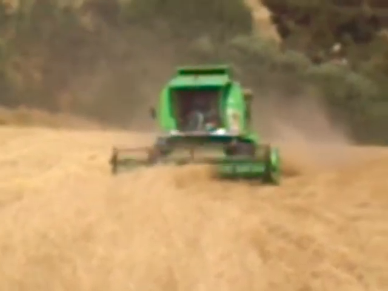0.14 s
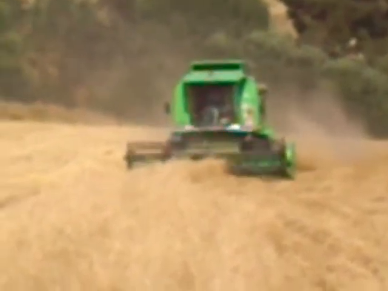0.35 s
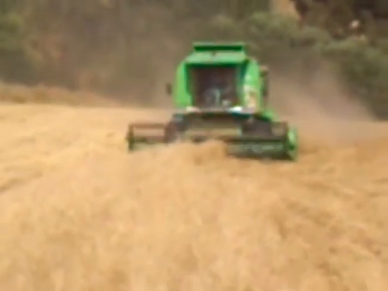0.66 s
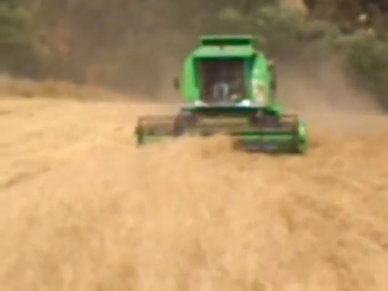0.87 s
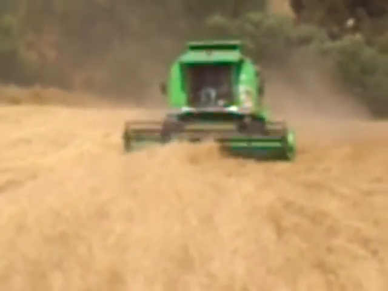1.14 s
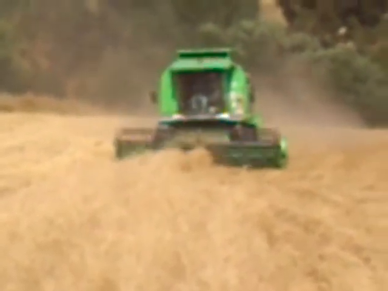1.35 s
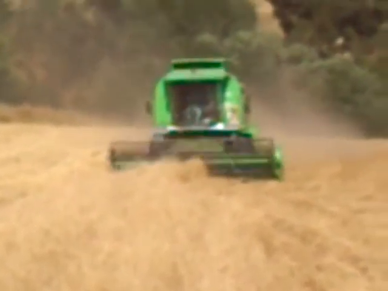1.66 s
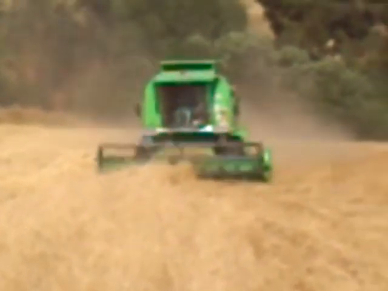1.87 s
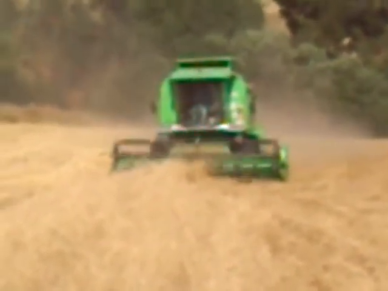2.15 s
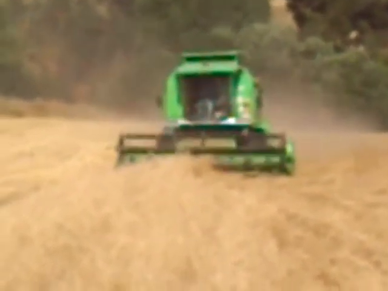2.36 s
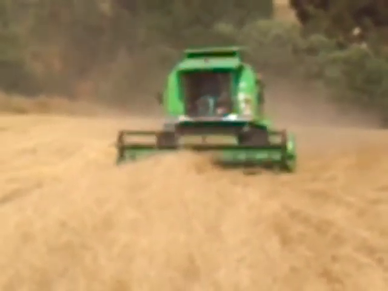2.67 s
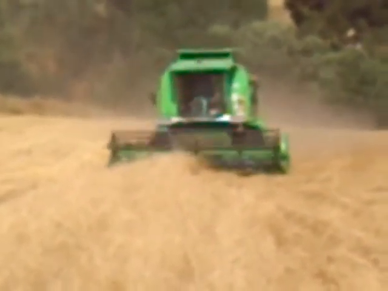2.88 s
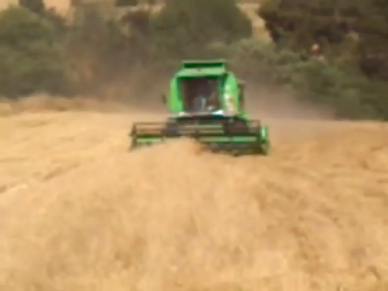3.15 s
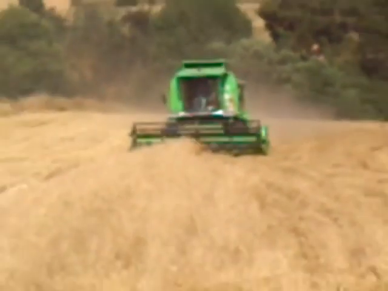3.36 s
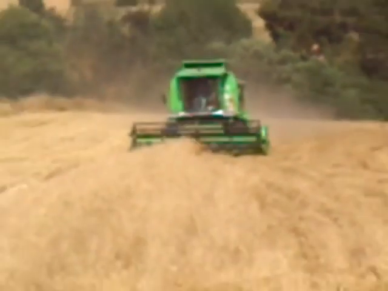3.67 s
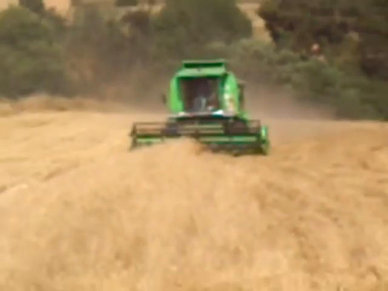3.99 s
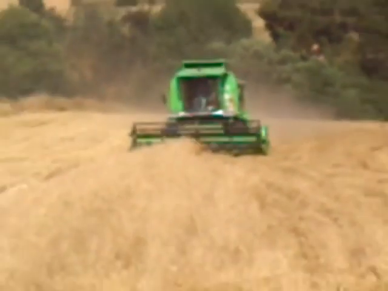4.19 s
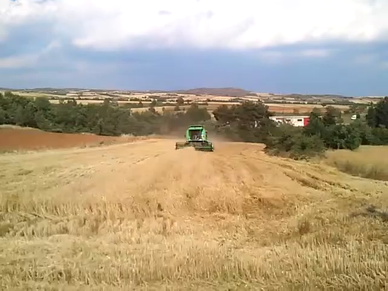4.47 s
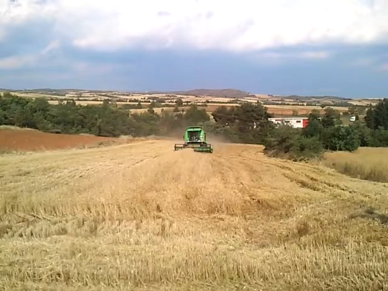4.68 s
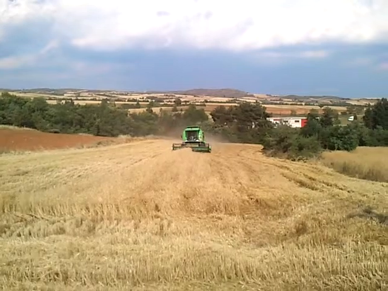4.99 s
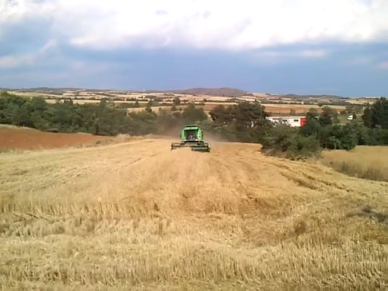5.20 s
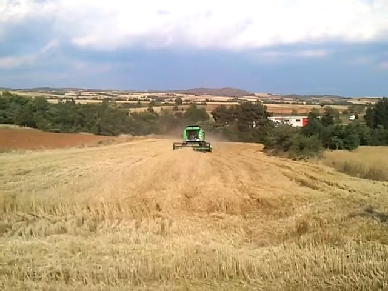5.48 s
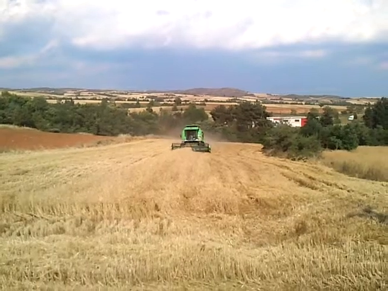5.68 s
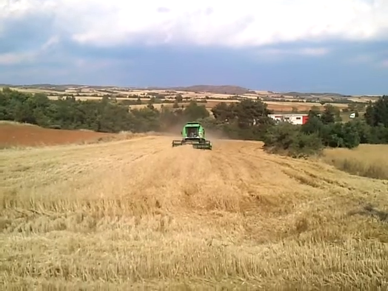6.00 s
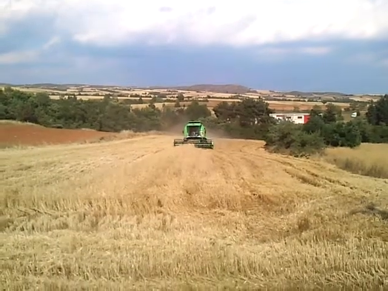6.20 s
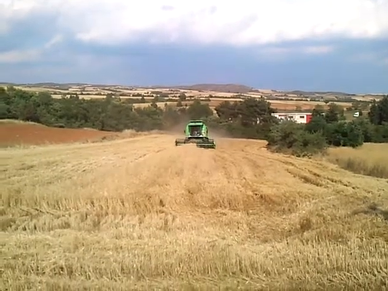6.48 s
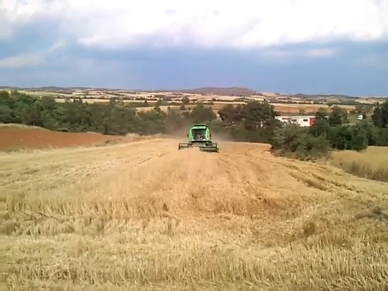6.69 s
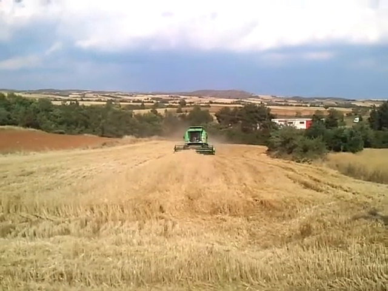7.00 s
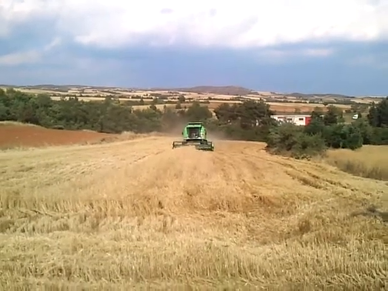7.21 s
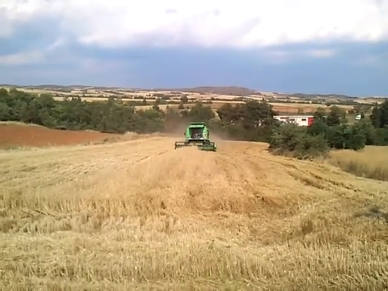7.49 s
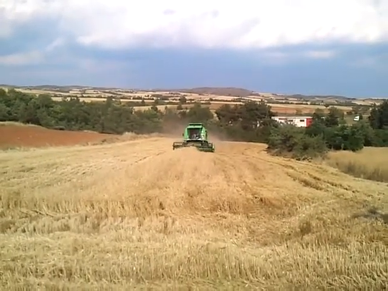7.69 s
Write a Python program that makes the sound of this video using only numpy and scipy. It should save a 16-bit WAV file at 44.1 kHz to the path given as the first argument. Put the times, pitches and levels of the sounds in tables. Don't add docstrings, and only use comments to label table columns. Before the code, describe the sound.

Outdoor handheld sound of a far harvester working under load: constant engine and fan hum, broad straw and metal roar. Wind rumbles and thumps unevenly across both channels, heavier on the left, building to a crackling burst after four seconds and then dropping. Dry straw hisses, a high cricket trills softly at left, a switch clicks twice, the second time louder, and a bird peeps faintly.

```python
import sys
import numpy as np
from scipy import signal
from scipy.fft import rfft, irfft
from scipy.io import wavfile
from scipy.ndimage import uniform_filter1d

SR = 44100
rng = np.random.default_rng(int(sys.argv[2]) if len(sys.argv) > 2 else 0)


def master_out(mix):
    frames = np.transpose(np.atleast_2d(mix))
    ceiling = np.clip(frames, -1, 1)
    pcm = np.round(ceiling * 32767).astype(np.int16)
    wavfile.write(sys.argv[1], SR, pcm)


def natural_amplitude(level_db):
    exponent = np.asarray(level_db, float) / 20
    return 10 ** exponent


N = 346185
T = np.arange(N) / SR

# (pitch [Hz], level [dB], unsteadiness [dB])
HUM_TONES = [(60.6, -40.5, 3), (121.5, -43, 1), (136.6, -29.5, -0.02), (196.8, -44.5, 3), (259.4, -45, 0),
             (274.1, -46.5, 3), (316, -56, -4), (379, -56, 3), (387, -63, 14), (415.5, -63, 6),
             (425.3, -58, -15), (450, -72.5, 2), (602.5, -61.5, 8), (1162, -73.5, 7)]
FIRING_HZ = 61.6
# (time [s], threshing [dB], stalk rustle [dB])
FIELD_LEVELS = [(0, -42, -55), (.3, -42.5, -58.5), (.75, -43.5, -53.5), (1.4, -45.5, -56),
                (2.1, -44.5, -56), (2.7, -44, -53.5), (3.05, -40, -49.5), (3.5, -38.5, -47),
                (4.1, -41, -48.5), (4.8, -41, -50.5), (5.4, -39.5, -44.5), (6, -43, -51), (6.7, -43, -49.5),
                (7.2, -41.5, -55.5), (7.85, -42, -53.5)]
# (frequency [Hz], level [dB per Hz])
ROAR_COLOUR = [(40, -4), (100, -4), (165, -9.5), (225, -9), (270, -13.5), (350, -17.5), (420, -12),
               (495, -26.5), (560, -23), (900, -24.5), (1100, -24.5), (1700, -29.5), (2300, -32),
               (3200, -70.5)]
# (centre [Hz], width [Hz], level [dB])
HOUSING_RINGS = [(622, 100, 3.5), (754, 77, 5), (859, 73, 6.5), (1237, 320, -0.5), (1502, 110, -0.5),
                 (2100, 80, -1.5)]
RING_DB, RING_DB_PER_DB = 1.5, 1.17
GROUND_DB, EARLY_BOUNCE_DB = -11, 1.5
GROUND_FROM_HZ, GROUND_TO_HZ, GROUND_SETTLE_S = 900, 772.5, 1.5
# (frequency [Hz], level [dB per Hz])
STALK_COLOUR = [(1350, 15.5), (2300, -6.5), (2430, -1.5), (2800, 4.5), (3280, -10), (4130, 3), (5070, -3),
                (6130, -3.5), (6440, -7.5), (6910, -17), (7600, -21), (9880, -41), (16700, -120)]
# (frequency [Hz], left minus right [dB])
PORT_DIFFERENCE = [(60, 6), (200, 0.5), (640, 0.5), (950, -0.5), (1500, -7), (1950, 2.5), (2800, 4.5),
                   (3500, 1.5), (4300, 7), (5300, 6.5), (6000, 27), (12000, 27)]
LEFT_LEAD = 4

# (time [s], level [dB])
BREEZE = [(0, -22), (.4, -33), (.75, -30.5), (1, -21), (1.6, -23.5), (2.1, -26.5), (2.75, -28.5),
          (2.92, -14.5), (3.8, -20), (4.4, -17.5), (4.65, -26), (5.08, -26.5), (5.25, -43), (5.85, -44),
          (6.4, -35.5), (7, -36), (7.85, -29)]
LEE_DB = -12.5
# (time [s], left level [dB], right level [dB])
PUFFS = [(0, -23.5, -34), (.2, -30.5, -27), (.5, -30, -31), (.8, -42, -29), (0.901, -20, -31),
         (1.1, -22, -27), (1.299, -22, -24.5), (1.501, -19.5, -18), (1.75, -30, -24), (1.9, -24, -40),
         (2.2, -24.5, -28), (2.4, -30, -40), (2.6, -33, -34), (2.999, -17.5, -29), (3.1, -30, -24),
         (3.3, -16.5, -21), (3.5, -17, -37), (3.7, -20.5, -36), (3.9, -16, -30), (4.2, -14, -23),
         (4.299, -16.5, -17), (4.501, -13.5, -20), (4.7, -17.5, -30), (5.001, -24.5, -43), (5.5, -32, -52),
         (6, -28, -50), (6.199, -28.5, -33), (6.8, -27.5, -38), (7.15, -21.5, -33), (7.4, -22.5, -42)]
PUFF_S = 0.046
# (frequency [Hz], level [dB per Hz])
EDDY_COLOUR = [(12, -0.5), (25, 8.5), (50, 0.5), (100, -2.5), (200, -12), (400, -24.5), (800, -48),
               (1600, -58.5), (3000, -120)]
# (time [s], level [dB], treble share [dB])
LEFT_BURSTS = [(0.899, -22, -22), (1.092, -27.5, -16), (1.319, -17, -13.5), (1.918, -21, -14.5),
               (2.884, -15.5, -13.5), (2.983, -16.5, -13.5), (3.033, -15, -5.5), (3.211, -18.5, -8.5),
               (3.368, -14.5, -20), (3.44, -17, -17), (3.518, -12.5, -13), (3.718, -24, -19),
               (3.823, -18, -12), (3.868, -16.5, -7), (3.927, -18.5, -3), (4.055, -15, -14.5),
               (4.118, -19, -0.5), (4.146, -16, -7.5), (4.186, -18.5, -2), (4.208, -22, -5),
               (4.257, -17, -5.5), (4.293, -14.5, -12.5), (4.346, -7.5, -12), (4.41, -20.5, -1.5),
               (4.466, -7.5, -12.5), (4.498, -18, -7), (4.539, -15, -8), (4.703, -17, -8),
               (5.003, -24.5, -5), (7.7, -28, -27)]
# (time [s], level [dB], treble share [dB])
RIGHT_BURSTS = [(1.077, -21, -12.5), (1.153, -23.5, -19), (1.219, -20, -10), (1.382, -25, -18),
                (1.518, -15.5, -16.5), (1.594, -16.5, -24), (3.065, -29, -2), (3.118, -32, -15),
                (3.264, -28, -12), (3.307, -36, -16), (3.846, -20, -15), (4.302, -24, -9), (4.34, -20, -16),
                (4.482, -18, -12), (4.571, -24, -19)]
DEEP_SHARE = .17

STRUM_HZ = 19.7
# (time [s], slip [cycles])
STRUM_SLIP = [(0, .15), (.4, .16), (.8, .02), (2, 0), (3, -.19), (4.4, -.15), (6, -.32), (7.2, -.16),
              (7.85, -.18)]
# (centre [Hz], width [Hz], level [dB])
WING_RINGS = [(9030, 1730, -9), (9857, 600, 2), (10870, 650, -1.5), (12700, 470, -11.5)]
# (start [s], end [s])
WING_REST = (0.956, 1.15)
# (frequency [Hz], level [dB per Hz])
CHORUS_COLOUR = [(4120, -49), (7000, -10.5), (9310, 4), (9570, 3.5), (10100, -18.5), (10400, -3.5),
                 (11300, -6), (12700, -11), (16500, -54), (22000, -120)]
CRICKET_DB, SHY_DB_PER_DB = -51, -0.04

# (time [s], level [dB], centre [Hz], width [Hz], time to fade by 60 dB [s])
CLICKS = [
    (5.593, -31, 3120, 1800, 0.004),
    (5.613, -30.5, 450, 500, 0.025),
    (5.606, -41, 6400, 3004, .006),
    (6.841, -31, 4900, 3940, 0.0079),
    (6.85, -23, 2900, 4000, 0.0044),
    (6.864, -26.5, 3000, 5000, 0.015),
    (6.868, -28.5, 490, 930, 0.033),
]
# (time [s], level [dB], start pitch [Hz], end pitch [Hz], length [s])
PEEPS = [
    (7.262, -56, 3700, 2850, .022),
    (7.318, -57, 3600, 2850, .021),
]

CEILING = 1.05
# (frequency [Hz], level [dB per Hz])
SILENCE_BELOW = [(1500, -110), (2400, -100), (4500, -99), (7500, -99), (10000, -101), (11800, -99),
                 (12400, -95), (13500, -94)]
RIGHT_SILENCE_DB = 4.5
# (time [s], length [s], threshold rise [dB])
DROPOUTS = [(.06, .02, 7.5), (.98, .02, 6), (1.154, .06, 10), (1.256, .02, 9.5), (1.32, .045, 7.5),
            (1.501, .05, 6), (1.57, .07, 5), (1.928, .07, 7.5), (2.879, .03, 7.5), (3.24, .07, 7),
            (3.36, .02, 5.5), (4.39, .045, 14), (4.51, .025, 7), (7.14, .01, 8.5), (7.45, .025, 7),
            (7.7, .02, 8.5)]
TREBLE_DROPOUT = .35


def unit(x):
    return x / np.sqrt(np.mean(x ** 2))


def curve(rows, column):
    rows = np.array(rows, float)
    return np.interp(T, rows[:, 0], rows[:, column])


def shape(x, points):
    hz, db = np.transpose(points)
    f = np.maximum(np.fft.rfftfreq(N, 1 / SR), 1)
    gain = natural_amplitude(np.interp(np.log(f), np.log(hz), db))
    return irfft(rfft(x) * gain, N)


def band(x, hz, width):
    return signal.lfilter(*signal.iirpeak(min(hz, .45 * SR), hz / width, SR), x)


def walk(rate):
    k = int(SR / rate)
    steps = np.repeat(rng.standard_normal(N // k + 1), k)
    return 1.27 * uniform_filter1d(uniform_filter1d(steps, k), k)[:N]


def living(points, lo_hz, hi_hz, shared_db, own_db, rate, grit=0.):
    grains = natural_amplitude(grit * np.minimum(rng.exponential(size=N), 6))
    spectrum = rfft(shape(rng.standard_normal(N) * grains, points))
    octave = np.log2(np.maximum(np.fft.rfftfreq(N, 1 / SR), 1))
    shared = walk(rate)
    out = 0
    for centre in np.arange(np.log2(lo_hz), np.log2(hi_hz) + .5, .5):
        part = irfft(spectrum * np.clip(1 - 2 * abs(octave - centre), 0, 1), N)
        out = out + part * natural_amplitude(shared_db * shared + own_db * walk(rate * 1.6))
    return unit(out)


def ports(direct, scattered, share):
    hz, db = np.transpose(PORT_DIFFERENCE)
    right_db = -20 * np.log10((1 + natural_amplitude(db)) / 2)
    left = np.roll(direct, -LEFT_LEAD) + share * scattered
    right = direct - share * scattered
    return np.array([shape(left, np.c_[hz, right_db + db]), shape(right, np.c_[hz, right_db])])


def hum():
    drift = np.cumsum(1 + 0.001495 * walk(1.487)) / SR
    out = 0
    for hz, db, unsteadiness in HUM_TONES:
        sway = np.clip(unsteadiness * walk(6), -4, 3)
        tone = np.sin(2 * np.pi * (hz * drift + rng.random()))
        out = out + np.sqrt(2) * natural_amplitude(db + sway) * tone
    return out


def ground():
    spread = unit(shape(rng.standard_normal(N), [(20, -2.0), (110, -3.5), (250, -13), (800, -67)]))
    early = np.exp(-T / GROUND_SETTLE_S)
    centre = GROUND_TO_HZ + (GROUND_FROM_HZ - GROUND_TO_HZ) * early
    centre = centre * (1 + .04 * walk(4))
    carrier = np.sqrt(2) * np.cos(2 * np.pi * np.cumsum(centre) / SR)
    return natural_amplitude(GROUND_DB + EARLY_BOUNCE_DB * early) * spread * carrier


def threshing():
    throb = 1 + 0.091 * np.cos(2 * np.pi * FIRING_HZ * T)
    direct, scattered = (living(ROAR_COLOUR, 47.2, 2900, 1., 1.0, 7, grit=1.5) for _ in range(2))
    level_db = curve(FIELD_LEVELS, 1)
    ringing = 0
    for hz, width, db in HOUSING_RINGS:
        ringing = ringing + natural_amplitude(db - 6 + 1.7 * walk(4.37)) * band(direct, hz, width)
    direct = direct + natural_amplitude(RING_DB + RING_DB_PER_DB * (level_db + 43.5)) * ringing
    load = natural_amplitude(level_db + 4.5)
    return ports(hum() + load * throb * (direct + ground()), load * scattered, 0.055)


def stalks():
    direct, scattered = (living(STALK_COLOUR, 2000, 7300, 0.99, 1., 5, grit=1.4) for _ in range(2))
    return natural_amplitude(curve(FIELD_LEVELS, 2) - 1) * ports(direct, scattered, 0.65)


def gusts():
    power = natural_amplitude(curve(BREEZE, 1) + np.array([[0], [LEE_DB]])) ** 2
    for s, *db in PUFFS:
        bell = np.exp(-((T - s) / PUFF_S) ** 2)
        power = power + natural_amplitude(np.array(db))[:, None] ** 2 * bell
    return 10 * np.log10(power)


def bursts(rows):
    out = np.zeros(N)
    span = np.arange(-700, 700)
    window = np.hanning(len(span)) * np.exp(-.5 * (span / SR / 0.019) ** 2)
    low = shape(rng.standard_normal(N), [(60, -34.0), (130, 13.5), (450, -5.5), (900, -40), (3000, -83)])
    high = shape(rng.standard_normal(N), [(100, -62), (300, -3.0), (550, 0.5), (1200, -12.5),
                                          (2500, -29.5), (5000, -67)])
    for s, db, treble_db in rows:
        at = int(s * SR) + span
        thump = unit(low[at] * window)
        flutter = unit(high[at] * window ** 0.74)
        crack = unit(high[at + 2000] * window ** 8)
        out[at] += natural_amplitude(db - 5.5) * (thump + natural_amplitude(treble_db) * (flutter + 0.66 * crack))
    return out


def wind():
    gust_db = gusts()
    rumble = np.array([living(EDDY_COLOUR, 16.26, 2900, 4.4, 3.24, 20) for _ in range(2)])
    rumble /= np.sqrt(uniform_filter1d(rumble ** 2, SR // 8, axis=1))
    grille = [(100, -11), (250, 1), (700, -7.5), (1400, -21.5), (3000, -48.5)]
    crackle = np.array([unit(shape(rng.standard_normal(N), grille)) * natural_amplitude(4.9 * walk(45))
                        for _ in range(2)])
    rumble = rumble * natural_amplitude(gust_db + 1)
    rumble[1] += DEEP_SHARE * shape(rumble[0], [(40, -2.1), (120, -7.5), (300, -27)])
    crackle = crackle * natural_amplitude(1.8 * (gust_db + 18) - 42)
    return rumble + crackle + [bursts(LEFT_BURSTS), bursts(RIGHT_BURSTS)]


def cricket():
    cycles = STRUM_HZ * T + curve(STRUM_SLIP, 1) + 1
    first, second = natural_amplitude(2.0 * rng.standard_normal((200, 2)))[cycles.astype(int)].T
    strokes = 0
    for at, width, gain, force in [(.1, 0.077, 0.97, first), (.43, 0.11, 0.63, second),
                                   (.7, 0.025, 0.11, first)]:
        strokes = strokes + gain * force * np.exp(-.5 * ((cycles % 1 - at) / width) ** 2)
    singing = (T < WING_REST[0]) | (T > WING_REST[1])
    scrape = strokes * singing * rng.standard_normal(N)
    song = 0
    for hz, width, db in WING_RINGS:
        song = song + natural_amplitude(db + 2.4 * walk(9)) * band(band(scrape, hz, width), hz, width)
    chorus = living(CHORUS_COLOUR, 6500, 13000, 0.33, 0.41, 10)
    level = natural_amplitude(CRICKET_DB + SHY_DB_PER_DB * (curve(BREEZE, 1) + 26))
    return level * (unit(song) + natural_amplitude(-4.5) * chorus) * [[1], [0]]


def switch():
    out = np.zeros(N)
    t = np.arange(2000) / SR
    for s, db, hz, width, t60 in CLICKS:
        rattle = 0.12 * rng.standard_normal(len(t)) * np.exp(-np.log(1000) * t / t60)
        snap = t == 0
        tick = band(band(rattle + snap, hz, width), hz, width)
        start = int(s * SR)
        out[start:start + len(t)] += natural_amplitude(db + 6.5) * tick / abs(tick).max()
    return ports(out, out, 0.042)


def bird():
    out = 0
    for s, db, from_hz, to_hz, length in PEEPS:
        part = np.clip((T - s) / length, 0, 1)
        cycles = np.cumsum(from_hz + (to_hz - from_hz) * part) / SR
        out = out + natural_amplitude(db) * np.sin(np.pi * part) * np.sin(2 * np.pi * cycles)
    return out


def scene():
    return threshing() + stalks() + wind() + cricket() + switch() + bird()


def silence_faint(x):
    window = np.sin(np.pi * (np.arange(2048) + .5) / 2048)
    f, s, z = signal.stft(x, SR, window=window, nperseg=2048, noverlap=1024)
    power = abs(z) ** 2 / 13 + 1e-20
    edges = np.unique((4 * 1.075 ** np.arange(80)).astype(int).clip(0, len(f) - 1))
    owner = np.clip(np.searchsorted(edges, np.arange(len(f)), "right") - 1, 0, None)
    width = np.diff(np.r_[edges, len(f)])[:, None]
    bands = (np.add.reduceat(power, edges, axis=1) / width)[:, owner]

    loud_db = 10 * np.log10(2 * (abs(z) ** 2).sum(axis=(0, 1)) + 1e-9)
    rise_db = 0.81 * np.clip(loud_db + 23, -4, 30) + 1.7 * rng.standard_normal(len(s))
    dropout_db = sum(db * (abs(s - at) < length / 2 + .011) for at, length, db in DROPOUTS)
    hz, floor_db = np.transpose(SILENCE_BELOW)
    limit_db = np.interp(f, [0, *hz], [-200, *floor_db])[:, None]
    limit_db = limit_db + (1.2 + 0.66 * (f[:, None] > 10600)) * rise_db
    limit_db = limit_db + np.where(f > 8000, TREBLE_DROPOUT, 1)[:, None] * dropout_db
    limit = natural_amplitude(limit_db + np.array([0, RIGHT_SILENCE_DB])[:, None, None]) ** 2
    ragged = natural_amplitude(3.8 * rng.standard_normal((2, len(edges), len(s))))[:, owner] ** 2
    kept = z * (bands > ragged * limit) * (power > .6 * limit)
    return signal.istft(kept, SR, window=window, nperseg=2048, noverlap=1024)[1][:, :N]


def low_pass(x):
    return signal.sosfilt(signal.butter(12, 13700, fs=SR, output="sos"), x)


def record(dry):
    rounded = dry / (1 + abs(dry / CEILING) ** 4) ** (1 / 4)
    mix = silence_faint(rounded)
    return low_pass(mix)


dry = scene()
out = record(dry)
master_out(out)
```